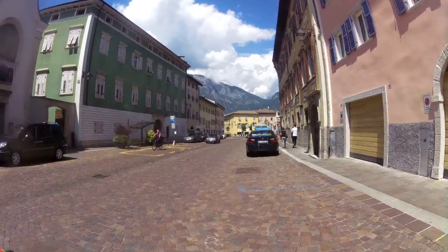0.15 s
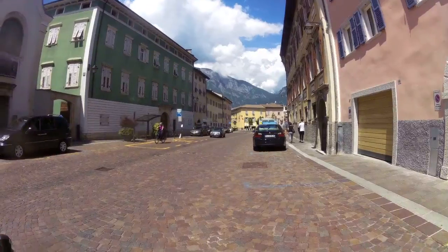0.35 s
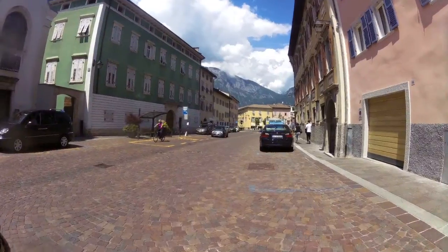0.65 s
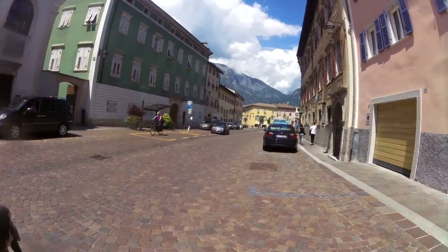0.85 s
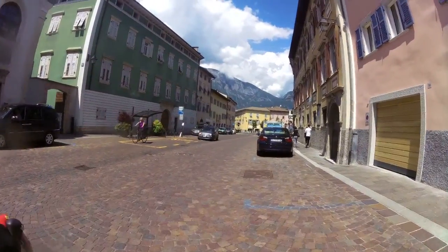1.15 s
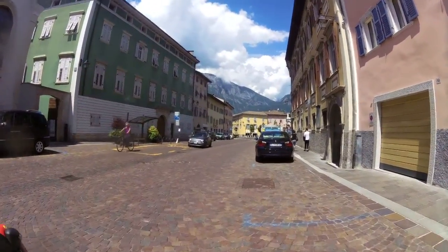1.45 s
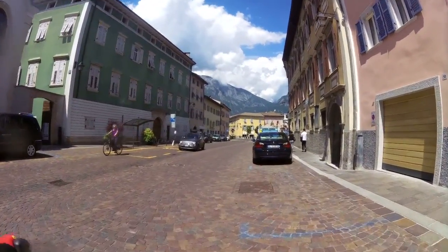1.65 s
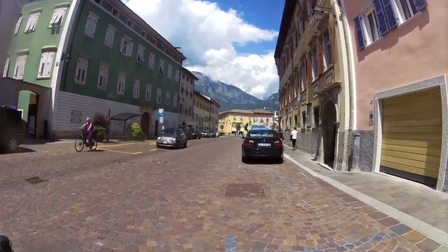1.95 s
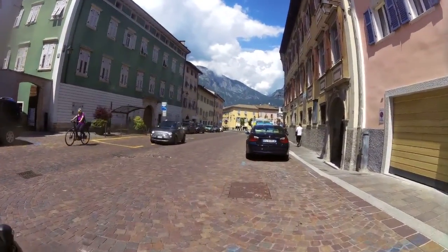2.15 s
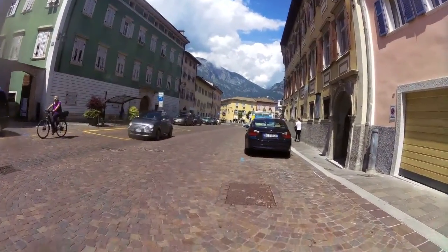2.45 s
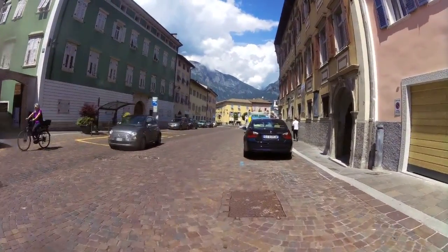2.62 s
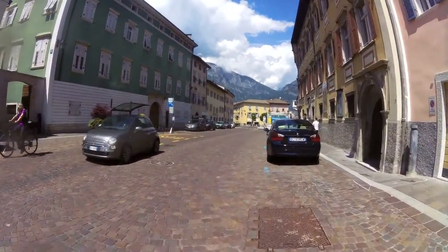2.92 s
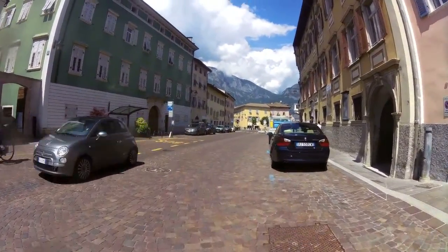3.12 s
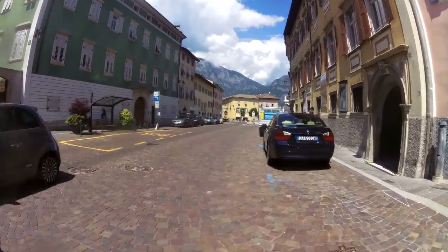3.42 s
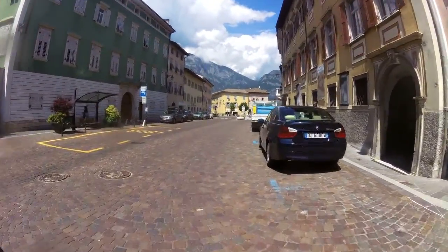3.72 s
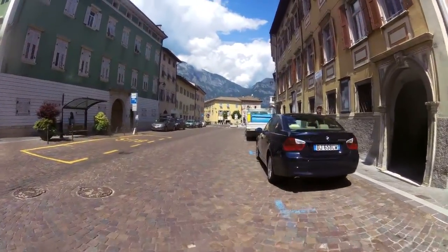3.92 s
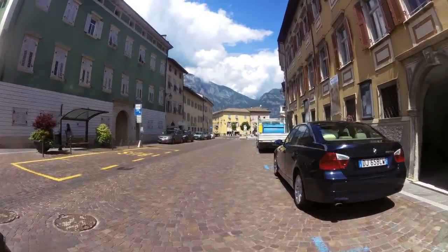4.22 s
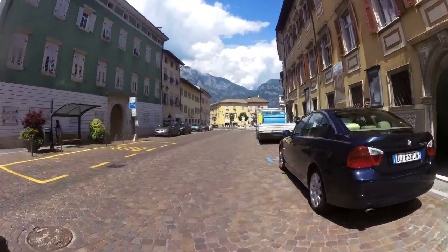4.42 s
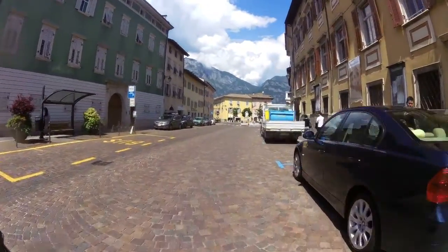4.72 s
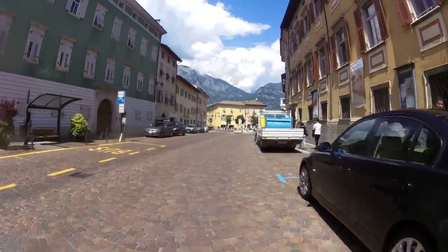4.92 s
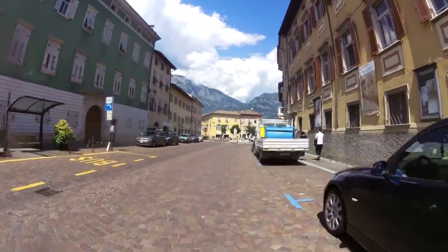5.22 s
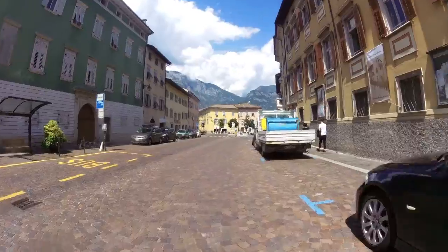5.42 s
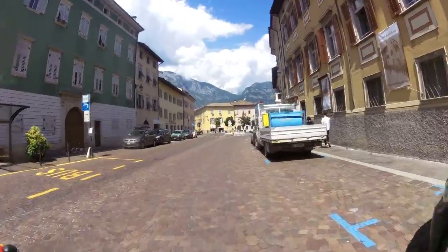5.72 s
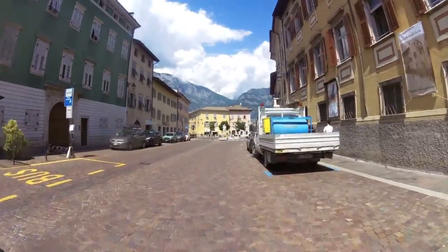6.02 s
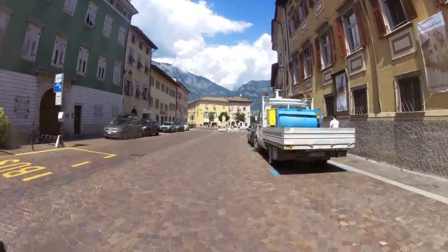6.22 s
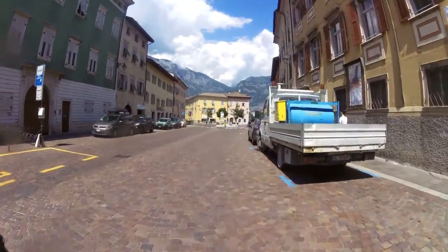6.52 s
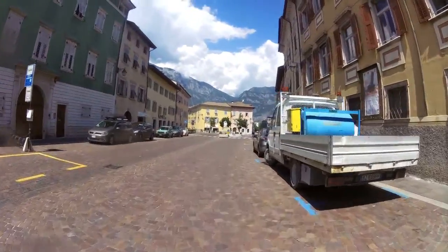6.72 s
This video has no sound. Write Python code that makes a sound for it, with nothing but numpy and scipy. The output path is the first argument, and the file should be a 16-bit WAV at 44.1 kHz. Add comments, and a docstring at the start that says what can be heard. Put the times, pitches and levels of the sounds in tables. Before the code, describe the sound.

Heard from a plastic case on a bicycle handlebar in a cobbled town street: tyre roar fades in with chain ticks and case taps. A brake pad scuffs the rim, a hard knock follows, then low wind buffeting begins. A car passes with slapping stones, a metal fitting clanks, and the rattling grows denser, with two faint bird chirps near the end.

```python
"""A bicycle rolls down a cobbled town street, heard from a plastic case on its handlebar.
Tyre noise fades in, hiss ahead of roar, with chain and cable ticks and case taps: noise and struck resonances.
The mount knocks from 0.4 s; from 1.2 s a brake pad scuffs the rim (banded noise); from 2.1 s wind buffets the case.
Stones slap under a car passing at 3.4 s (delayed noise); a fitting clanks at 3.9 s, a parked car returns a swish
at 4.65 s, and a small bird chirps at 5.0 and 5.8 s (gliding tones) as the shaking rises and falls."""
import sys
import numpy as np
from scipy import signal
from scipy.fft import rfft, irfft, next_fast_len
from scipy.io import wavfile
from scipy.ndimage import uniform_filter1d, map_coordinates

SR = 44100
rng = np.random.default_rng(int(sys.argv[2]) if len(sys.argv) > 2 else 0)


def dump_mix(stems):
    """Bounce the given channels to the path in sys.argv[1] as a 16-bit WAV at rate SR."""
    frames = np.atleast_2d(stems).T  # one column per channel
    limited = np.clip(frames, -1, 1)  # hard clip at full scale
    pcm = np.round(limited * 32767).astype(np.int16)
    wavfile.write(sys.argv[1], SR, pcm)


N = 302702

# All levels precede the final fade and limiting. Spectra give relative shape only.
# Resonances list centre_hz, width_hz, gain_db for one pass.

# Bird chirps, before a 3 dB cut in the sum: start_s, peak_db
BIRD_CHIRPS = [(4.984, -44), (5.846, -42)]
CHIRP_FROM_HZ, CHIRP_TO_HZ, CHIRP_S = 4600, 3200, 0.12

# Spectrum of the car's tyre roar: frequency_hz, density_db
CAR_SPECTRUM = [(120, -13.5), (300, 3), (600, -7.5), (800, -4), (950, 0.5), (1100, 0), (1350, -6),
                (1700, -8.5), (2200, -17.5), (3000, -25), (4500, -47.5), (6000, -56), (8500, -57),
                (12000, -82.5)]
# Band in which the car's tread drums on single stones: centre_hz, width_hz, gain_db
CAR_TREAD_MODES = [(1000, 165, 0)]
PASS_S, CAR_DB = 3.42, -24.5  # moment of passing, mean level then
GAP_M, CLOSING_M_PER_S, SOUND_M_PER_S = 7.5, 8.5, 343
CAR_FALLOFF = 2.01  # power of distance by which amplitude falls
TREAD_DB, TREAD_SLAPS_PER_S = -5, 100  # drumming against the roar; mean rate of stones struck

# Steady wind on the case: time_s, level_db
WIND_LEVEL = [(.25, -45), (.6, -41.5), (.95, -34.5), (1.3, -38), (2.05, -35.5), (2.14, -27), (3.7, -26),
              (4.4, -26), (4.9, -23.5), (5.6, -25.5), (6.2, -26), (6.86, -24.5)]
# Lulls added to the steady wind: middle_s, half_width_s, depth_db
WIND_LULLS = [(2.869, 0.03976, -4), (4.57, 0.0259, -5), (5.571, 0.0446, -4), (5.86, 0.0417, -3.5),
              (6.07, .025, -3), (6.51, .07, -3)]
# Gusts on top of it: start_s, length_s, strength_db
WIND_GUSTS = [(2.134, 0.13, 6), (2.448, 0.0526, 5), (2.572, .14, 5.5), (3.038, 0.44, 7), (3.962, 0.1318, 6),
              (4.122, 0.02746, 6.5), (4.224, 0.0836, 8.5), (4.339, 0.076, 12), (4.497, 0.0335, 5.5),
              (4.61, 0.0453, 7.5), (4.74, 0.049, 3.5), (4.908, 0.0702, 7), (5.004, .14, 9.5),
              (5.208, .11, 7), (5.363, 0.0914, 6.5), (5.628, 0.022, 5), (5.699, 0.083, 9),
              (5.973, 0.039, 6), (6.099, 0.0778, 5.5), (6.253, 0.0755, 5.5), (6.597, 0.037, 9),
              (6.747, 0.16, 7.5)]
# Spectra of deep buffeting and higher flutter, at the reference wind: frequency_hz, density_db
BUFFET_SPECTRUM = [(20, -28.5), (32, -20), (50, -5.5), (75, 0.5), (130, 4), (200, 1.5), (270, -1.5),
                   (400, -18.5), (800, -83)]
FLUTTER_SPECTRUM = [(130, -15), (230, -2.5), (290, 2.5), (400, 0), (520, -5), (700, -14.5), (1200, -53),
                    (2500, -74)]
GUST_ATTACK_S, GUST_RELEASE_S = 0.006, 0.03
BUFFET_GROWS, FLUTTER_DB = 0.4, -11  # share of gust dB given to buffeting; flutter against steady wind
EDDY_RISE, EDDY_REFERENCE_DB = .16, -22.5  # dB of pitch per dB of wind; wind that leaves pitch as it is
STEADY_S, STEADINESS = 0.062, 0.5  # span over which wind noise evens out, and how fully (0-1)

# Jolts through the frame: start_s, peak_db, pitch_hz
FRAME_JOLTS = [(1.839, -15, 330), (2.104, -13, 380), (2.689, -13, 200), (3.07, -11.5, 290),
               (3.11, -13, 230), (3.181, -13, 250), (3.904, -11, 480), (4.027, -10, 400), (4.244, -7, 320),
               (4.274, -13, 300), (4.41, -12, 225), (4.789, -13, 200), (5.273, -13, 250), (5.769, -10, 205),
               (6.181, -16, 480), (6.229, -11, 450), (6.607, -12, 250), (6.638, -11, 370)]

# Onsets of brake scuffing: start_s, level_db
BRAKE_SCUFFS = [(1.185, -31), (1.46, -40.5)]
# Bands in which the rim sings: centre_hz, width_hz, gain_db
RIM_MODES = [(1410, 90, 11.5), (1950, 210, 2), (2700, 80, -3), (3200, 98, -7), (3790, 70, -6.5),
             (4410, 55, -12.5), (4770, 150, -23), (5600, 150, -26), (6430, 180, -22), (8000, 600, -22)]
SCUFF_ATTACK_S, SCUFF_HOLD_S, SCUFF_T60_S = .005, 0.05, 0.87  # hold counts from the onset
SCUFF_GRIT_DB = -20  # grit under the pad, against the singing rim

# Knocks of the plastic mount, and from 2.98 to 3.88 s slaps of stones under the passing car's tyres:
# start_s, peak_db, pitch_factor, brightness_edge_hz, added_damping_t60_s
KNOCKS_AND_SLAPS = [(.408, -20, 1.1, 1600, .012), (1.628, -11, 1, 800, .1), (1.632, -14, 1, 1200, .03),
                    (1.8382, -1, 1.04, 6000, .035), (1.8575, -12, 1.07, 4500, .02),
                    (1.8605, -6, 1.04, 2200, .04), (1.867, -7, 1.02, 1500, .03),
                    (2.106, -17, 1.3, 2500, .03), (2.981, -15, 1.25, 1300, .03),
                    (3.066, -12, 1.26, 1400, .03), (3.32, -14, 1.45, 1500, .03),
                    (3.529, -10.5, 1.45, 1500, .02), (3.773, -11, 1.25, 1300, .02),
                    (3.794, -10.5, 1.35, 1400, .02), (3.882, -9, 1.4, 1300, .025),
                    (5.322, -19, 1.1, 1200, .06)]
# Resonances of these knocks and slaps before the pitch factor: centre_hz, width_hz, gain_db
KNOCK_MODES = [(726, 143, 9), (1063, 115, 10), (1350, 315, 3), (2520, 440, -4.5), (3230, 210, -18.5),
               (4400, 410, -18), (8060, 1300, -31)]
# Clanks of a loose metal fitting: start_s, peak_db, brightness_edge_hz
FITTING_CLANKS = [(3.902, 0, 4800), (3.933, -19.5, 3000), (4.248, -15, 1790), (4.255, -15, 1300)]
# Resonances of the fitting: centre_hz, width_hz, gain_db
FITTING_MODES = [(1005, 170, -4.5), (1563, 80, 4.5), (1935, 190, -5.5), (2390, 160, 2), (3180, 460, -13),
                 (3670, 210, -10), (5380, 720, -18.5), (8400, 1800, -52)]
# Ringing after a clank: frequency_hz, level_relative_to_clank_db, t60_s
FITTING_TAIL = [(2380, -10.5, 0.036), (2487, -40.5, 0.23), (2610, -28, 0.13), (3505, -46, .26),
                (5389, -57, .35), (6550, -64, .25)]
REBOUND_S, REBOUND_LOSS_DB = .0025, 6  # each knock or slap rebounds once
BOUNCE_S, BOUNCE_LOSS_DB = .0022, 4.5  # the fitting bounces twice

# Chain and cable ticks, and at 1.838 and 1.863 s the bright crack of the mount knocks, # before TICK_GAIN_DB
# and CRACK_DB: start_s, peak_db, pitch_hz, crack_level_db
CHAIN_TICKS = [(0.3195, -38, 3520, -62), (0.405, -43.5, 3340, -61), (0.543, -35, 3200, -63),
               (0.671, -24.5, 3800, -68), (0.679, -33, 3700, -63), (0.7188, -34.5, 2950, -74),
               (0.747, -35, 3160, -68), (0.769, -28, 3220, -55), (0.8784, -32, 2800, -72),
               (0.9093, -30, 3100, -65), (0.9583, -34, 3200, -63), (1.051, -37, 3000, -69),
               (1.0665, -33, 2800, -70), (1.1253, -41, 2810, -64), (1.1932, -29, 3770, -71),
               (1.3403, -39, 3180, -57), (1.369, -34, 2910, -75), (1.425, -32, 2780, -69),
               (1.5532, -27.5, 2970, -70), (1.636, -34, 3000, -68), (1.718, -25, 2830, -62),
               (1.798, -28, 2850, -63), (1.827, -28, 3060, -63), (1.8377, -19, 3570, -47),
               (1.863, -16.5, 2820, -54), (1.8814, -42, 3170, -63), (1.933, -31, 2840, -63),
               (2.028, -35, 3070, -64), (2.0927, -24, 2920, -60), (2.2852, -38, 2780, -62),
               (2.3955, -36, 2900, -61), (2.5224, -34, 3250, -61), (2.6025, -33, 2850, -73),
               (2.6693, -40, 2850, -88), (2.7684, -29, 2800, -67), (2.838, -35, 2930, -69),
               (3.1822, -22.5, 2770, -55), (3.356, -38, 3010, -51), (3.3997, -37, 3190, -56),
               (3.451, -48, 3150, -73), (3.506, -32, 2940, -68.5), (3.66, -27.5, 3080, -58),
               (3.782, -30.5, 3020, -56), (3.8505, -29, 2833, -50), (4.414, -38, 2840, -70),
               (4.488, -28.5, 3100, -52), (4.5431, -34, 3180, -57), (4.5854, -33, 2850, -74),
               (4.637, -28, 4050, -59), (4.6495, -20, 2820, -42.5), (4.7085, -24.5, 2832, -50),
               (4.7486, -42, 2800, -71), (4.7826, -28, 2800, -58), (4.824, -24.5, 2900, -64),
               (4.86, -26, 2871, -68), (4.94, -31, 3787, -69), (4.955, -26, 2960, -67),
               (4.9747, -29, 3650, -48), (5.016, -20, 3660, -54), (5.32, -32, 3070, -60),
               (5.343, -27.5, 2960, -62), (5.402, -34, 2960, -62), (5.5054, -29, 3209, -56),
               (5.5395, -31, 2940, -70), (5.56, -24, 2940, -59), (5.583, -30, 4074, -49),
               (5.5994, -27.5, 2880, -58), (5.787, -31, 2900, -59), (5.807, -34, 2930, -65),
               (6.1444, -24, 2870, -57), (6.238, -35.5, 3160, -60), (6.2665, -23, 3280, -53),
               (6.303, -37, 3050, -60), (6.329, -28, 3120, -57), (6.37, -25, 3880, -59),
               (6.4009, -23, 2970, -53), (6.4712, -25, 3970, -44), (6.4934, -34, 2870, -62),
               (6.5305, -28, 2960, -55), (6.555, -31, 2970, -58), (6.6157, -27, 2960, -59),
               (6.6333, -22.5, 3610, -48), (6.649, -39, 2890, -70), (6.725, -30, 2940, -63),
               (6.776, -27, 3200, -55), (6.799, -18, 4000, -46), (6.8255, -19.5, 3670, -50)]
# Shivers of the chain after a bump: start_s, peak_db, t60_s, sizzle_peak_db
CHAIN_SHIVERS = [(1.63, -20.5, 0.055, -61), (1.843, -20, .07, -46), (1.864, -15.5, 0.017, -42),
                 (2.105, -26, 0.13, -47.5), (3.906, -26, 0.38, -46.5), (4.249, -16, 0.083, -54),
                 (5.585, -28, 0.27, -51), (5.72, -41, 0.35, -50.5)]
# One thin, sharp click: start_s, peak_db
SHARP_CLICK = (5.3375, -18)
# Resonances of the chain before each part's stretch: centre_hz, width_hz, gain_db
CHAIN_MODES = [(2270, 610, 2), (3800, 1180, -4), (5000, 620, -12), (8450, 1500, -19)]
# Bright resonances of a crack, passed twice: centre_hz, width_hz, gain_db
CRACK_MODES = [(5650, 1900, 0.5), (8860, 2700, -1.5)]
TICK_GAIN_DB, CRACK_DB = 0.5, 9.5  # added to the tick peaks; added to the crack levels to give peaks
OWN_RING_DB = 2.5  # gain of a part's own resonance beside the chain's
CHATTER_DB, CHATTER_GROWS = -53, 1.16  # rattle at 0 dB shaking, for each part size; its dB per dB of shaking

# Hard taps of the case, before TAP_GAIN_DB: start_s, peak_db
HARD_TAPS = [(.743, -21.5), (1.064, -24), (1.195, -19), (1.751, -18.5), (2.031, -20), (2.151, -21),
             (2.259, -19.5), (2.329, -19.5), (2.365, -19.5), (2.400, -20), (2.534, -18), (2.581, -20),
             (2.671, -19.5), (2.780, -16.5), (2.843, -17), (2.917, -18), (3.066, -24), (3.147, -16),
             (3.227, -26), (3.400, -23), (3.644, -17), (3.673, -14), (3.975, -17.5), (4.0266, -12),
             (4.143, -15.5), (4.1807, -13.5), (4.39, -23.5), (4.4122, -14.5), (4.5315, -10.5), (4.59, -20),
             (4.6508, -9), (4.7205, -16), (4.774, -23), (4.7965, -10), (4.880, -20), (4.9248, -15.5),
             (5.0308, -17), (5.0523, -16), (5.2389, -13.5), (5.2782, -17), (5.321, -15), (5.362, -21.5),
             (5.393, -22), (5.448, -19.5), (5.4895, -17), (5.54, -14.5), (5.5992, -13.5), (5.628, -21),
             (5.646, -20.5), (5.684, -16), (5.751, -19), (5.787, -19.5), (5.8325, -15), (5.877, -12.5),
             (5.913, -19), (5.934, -19.5), (6.008, -15.5), (6.038, -14.5), (6.0687, -15.5), (6.110, -22),
             (6.2146, -11.5), (6.335, -22), (6.3597, -12.5), (6.496, -19.5), (6.542, -21), (6.5797, -16),
             (6.632, -15), (6.707, -7.5), (6.768, -20.5), (6.788, -12)]
# Faint taps in between, as the case works loose: time_s, typical_peak_db
FAINT_TAP_LEVEL = [(0, -33), (2.3, -29), (6.86, -27)]
# Main and upper resonance of the case before scatter: centre_hz, width_hz, gain_db
CASE_MODES = [(1776, 217, 12), (2700, 600, -9)]
TAP_GAIN_DB, TAP_COLOUR_SCATTER_DB = -0.5, 4  # trim of hard taps; tap-to-tap spread of the upper mode
STONES_PER_S, STONE_SCATTER = 16, .17  # stones under the wheel; spread of timing, in stone spacings

# Relative shaking of the bicycle, which drives hiss and chatter: time_s, shaking_db
SHAKING = [(0, -6), (2.3, -8.5), (3.85, -1.5), (4.42, -4), (4.95, 3.5), (5.13, -8), (5.55, 3), (6.1, -1.5),
           (6.45, 3.5), (6.86, 4.5)]
# Tyre roar, before a 0.23 dB lift: time_s, level_db
TYRE_LEVEL = [(.25, -32.5), (.9, -33.5), (1.5, -32), (4.1, -30), (4.45, -34), (5.2, -35.5), (6.4, -36),
              (6.86, -34.5)]
# Spectra of tyre roar and of tread hiss or brake grit: frequency_hz, density_db
ROAR_SPECTRUM = [(150, -9.5), (350, -3.5), (600, -4), (780, 1.5), (950, -1), (1300, 0.5), (1700, -9),
                 (2200, -12.5), (2900, -22.5), (4000, -33), (6000, -70.5)]
HISS_SPECTRUM = [(1000, -18), (1800, 9), (2600, 0), (3300, -6), (4200, -9.5), (5000, -12), (6200, -27.5),
                 (7200, -25.5), (8700, -27.5), (10500, -44.5), (15000, -64.5)]
# Band of the swish off a parked car, passed twice: centre_hz, width_hz, gain_db
SWISH_MODES = [(1216, 200, 0)]
HISS_DB, HISS_GROWS = -47.5, 0.75  # hiss at 0 dB shaking; its dB per dB of shaking
HISS_LEAD_DB, HISS_LEAD_S = 10, .27  # early lift of the hiss: full for half this time, gone at its end
SWISH_S, SWISH_DB, SWISH_WIDTH_S = 4.65, -33, 0.26  # middle, level, time to fall 6 dB either side

# Overall fade-in, silent before its first row: time_s, gain_db
FADE_IN = [(.031, -22.5), (.11, -21), (.135, -11.5), (.2, -5), (.27, 0.5)]
TOP_HZ = 15800  # upper limit of the band


def amp(db):
    """Logarithmic level: decibels to an amplitude ratio."""
    return 10 ** (np.asarray(db) / 20)


def decay(t, t60):
    """Exponential damping: amplitude falls 60 dB in t60 seconds."""
    return amp(-60 * t / t60)


def unit(x):
    """Root-mean-square level: scale to rms 1."""
    return x / np.sqrt(np.mean(x ** 2) + 1e-20)


def clock():
    """Sampling: time of each sample in seconds."""
    return np.arange(N) / SR


def curves(rows):
    """Linear interpolation: one value per sample for each column after the time."""
    s, *columns = np.transpose(rows)
    return [np.interp(clock(), s, column) for column in columns]


def bell(middle_s, half_width_s):
    """Gaussian envelope: 1 at the middle, one half at the half width."""
    return .5 ** (((clock() - middle_s) / half_width_s) ** 2)


def wobble(rate):
    """Slow random modulation: a smooth curve through rate random knots a second."""
    knots = rng.standard_normal(int(N * rate / SR) + 4)
    return map_coordinates(knots, [np.arange(N) * rate / SR])


def filtered(x, response):
    """Linear filtering: multiply the spectrum by a complex response of frequency."""
    size = next_fast_len(len(x) + 8192)
    return irfft(rfft(x, size) * response(np.fft.rfftfreq(size, 1 / SR)), size)[:len(x)]


def coloured(x, spectrum):
    """Spectral shaping: filter by (Hz, dB) points on a logarithmic axis, at rms 1."""
    f, db = np.transpose(spectrum)
    return unit(filtered(x, lambda hz: amp(np.interp(np.log(hz + 1), np.log(f), db))))


def ring(x, modes, stretch=1):
    """Modal superposition: excite a body's damped resonances, all scaled in frequency by stretch."""
    def response(hz):
        f = hz / stretch
        total = 0
        for k, (centre, width, db) in enumerate(modes):
            damping = 1j * f * width
            # neighbouring modes have opposite signs
            total = total + (-1) ** k * amp(db) * damping / (centre ** 2 - f ** 2 + damping)
        return total
    return filtered(x, response)


def muffled(x, edge_hz, order):
    """Treble loss: a causal low-pass."""
    return signal.sosfilt(signal.butter(order, edge_hz, fs=SR, output='sos'), x)


def contact(grit, t60):
    """Impact excitation: a sharp impulse followed by a short dying chatter."""
    t = np.arange(SR // 10) / SR
    return (t == 0) + grit * rng.standard_normal(len(t)) * decay(t, t60)


def impacts(rate, spread_db):
    """Shot noise: randomly timed pulses of uneven size and either sign, at rms 1."""
    sizes = amp(spread_db * np.clip(rng.standard_normal(N), -2, 2)) * rng.choice([-1, 1], N)
    return unit(sizes * (rng.random(N) < rate / SR))


def steady(x):
    """Level compression: even out the slow swells of a noise, leaving its fast grain, at rms 1."""
    power = np.abs(uniform_filter1d(x ** 2, int(STEADY_S * SR))) + 1e-9
    return unit(x / power ** (STEADINESS / 2))


def add(track, s, db, sound):
    """Superposition: add a sound from time s with its peak at db."""
    room = track[max(round(s * SR), 0):][:len(sound)]
    room += (amp(db) * sound / np.abs(sound).max())[:len(room)]


def bird():
    """Frequency modulation: each chirp is a short, quivering whistle sliding down."""
    out, t = np.zeros(N), np.arange(SR // 8) / SR
    for s, db in BIRD_CHIRPS:
        glide_hz = np.interp(t, [0, CHIRP_S], [CHIRP_FROM_HZ, CHIRP_TO_HZ])
        hz = glide_hz * (1 + .035 * wobble(300)[:len(t)])
        swell = np.interp(t / CHIRP_S, [0, .15, .3, .5, .8, 1], [0, 1, .4, .1, .5, 0])
        add(out, s, db, swell * np.sin(2 * np.pi * np.cumsum(hz) / SR))
    return out


def street(x, t60):
    """Diffuse reflection: the house fronts return a dull, scattered tail."""
    t = np.arange(SR // 2) / SR
    scatter = muffled(rng.standard_normal(len(t)), edge_hz=5000, order=2)
    tail = scatter * decay(t, t60) * (t > .012)
    return signal.fftconvolve(x, tail / np.linalg.norm(tail))[:N]


def car():
    """Doppler effect: distance sets the level and delay of tyre noise, so its pitch sags as the car goes by."""
    distance_m = np.hypot(GAP_M, CLOSING_M_PER_S * (clock() - PASS_S))
    roar = coloured(rng.standard_normal(N) + 0.66 * impacts(rate=220, spread_db=6), CAR_SPECTRUM)
    blows = impacts(rate=TREAD_SLAPS_PER_S, spread_db=4)
    slaps = signal.fftconvolve(blows, contact(grit=0.58, t60=.03))[:N]
    drumming = unit(muffled(ring(slaps, CAR_TREAD_MODES), edge_hz=2130, order=4))
    sent = roar + amp(TREAD_DB) * drumming
    emission_s = clock() - distance_m / SOUND_M_PER_S
    heard = map_coordinates(sent, [emission_s * SR], mode='mirror')
    return amp(CAR_DB + 1.15 * wobble(45)) * (GAP_M / distance_m) ** CAR_FALLOFF * heard


def gusts():
    """Transient flow: strength in dB of the strongest gust at each moment."""
    shapes = []
    for s, length, db in WIND_GUSTS:
        rise = (clock() - s) / GUST_ATTACK_S + .5
        fall = (s + length - clock()) / GUST_RELEASE_S + 1
        shapes.append(db * np.clip(np.minimum(rise, fall), 0, 1))
    return np.max(shapes, axis=0)


def wind():
    """Vortex shedding: eddies press on the case in lumps; in a gust they come faster and flutter more."""
    steady_db = curves(WIND_LEVEL)[0]
    for s, half_width, db in WIND_LULLS:
        steady_db = steady_db + db * bell(s, half_width)
    gust_db = gusts()
    # faster air reads through the eddy noise faster, raising its pitch
    air_passed = np.cumsum(amp(EDDY_RISE * (steady_db + gust_db - EDDY_REFERENCE_DB)))

    def eddies(spectrum):
        noise = coloured(rng.standard_normal(N), spectrum)
        return steady(map_coordinates(noise, [air_passed], mode='mirror'))
    buffet = unit(amp(1.1 * wobble(40)) * eddies(BUFFET_SPECTRUM))
    flutter = unit(amp(2.6 * wobble(110)) * eddies(FLUTTER_SPECTRUM))
    buffet_gain = amp(steady_db + BUFFET_GROWS * gust_db)
    flutter_gain = amp(steady_db + FLUTTER_DB + gust_db)
    return buffet_gain * buffet + flutter_gain * flutter


def jolts():
    """Heavily damped oscillation: a high stone pushes the frame through a cycle or two."""
    out, t = np.zeros(N), np.arange(SR // 20) / SR
    for s, db, hz in FRAME_JOLTS:
        cycles = t * hz
        add(out, s, db, np.sin(2 * np.pi * cycles) * cycles * np.exp(-cycles / .5))
    return out


def brake():
    """Friction excitation: the pad grabs, rubs over grit and lets go; the rim sings in a few narrow bands."""
    pressure = np.zeros(N)
    for s, db in BRAKE_SCUFFS:
        t = clock() - s
        release = decay(np.maximum(t - SCUFF_HOLD_S, 0), SCUFF_T60_S)
        pressure += np.clip(t / SCUFF_ATTACK_S, 0, 1) * amp(db) * release
    rubbing = unit(muffled(ring(rng.standard_normal(N), RIM_MODES), edge_hz=4500, order=4))
    grit = coloured(impacts(rate=460, spread_db=11), HISS_SPECTRUM)
    return amp(0.89 * wobble(54)) * pressure * (rubbing + amp(SCUFF_GRIT_DB) * grit)


def knocks_and_slaps():
    """Damped impact: the mount knocks, or a stone slaps under the car's tyre; each rebounds once, softer."""
    out = np.zeros(N)
    for s, db, pitch, edge_hz, t60 in KNOCKS_AND_SLAPS:
        for k in range(2):
            blow = ring(contact(grit=0.17, t60=0.03), KNOCK_MODES, stretch=pitch)
            damped = blow * decay(np.arange(len(blow)) / SR, t60)
            add(out, s + k * REBOUND_S, db - k * REBOUND_LOSS_DB, muffled(damped, edge_hz, order=2))
    return out


def clanks():
    """Repeated impact: a metal fitting clanks, bounces a little softer each time, and rings on."""
    out, t = np.zeros(N), np.arange(SR // 3) / SR
    for s, db, edge_hz in FITTING_CLANKS:
        for hz, mode_db, t60 in FITTING_TAIL:
            phase = 2 * np.pi * hz * t + wobble(130)[:len(t)]
            add(out, s, db + mode_db, np.sin(phase) * decay(t, t60))
        for k in range(3):
            clank = ring(contact(grit=0.22, t60=0.028), FITTING_MODES)
            add(out, s + k * BOUNCE_S, db - k * BOUNCE_LOSS_DB, muffled(clank, edge_hz, order=2))
    return out


def crack(x):
    """Cascaded resonance: two passes through the bright modes."""
    return ring(ring(x, CRACK_MODES), CRACK_MODES)


def ticks():
    """Modal excitation: chain links and cables tick, each at its own pitch, with a bright crack."""
    out = np.zeros(N)
    for s, db, hz, crack_db in CHAIN_TICKS:
        blow = contact(grit=0.19, t60=0.025)
        chain = ring(blow, CHAIN_MODES, stretch=np.exp(0.14 * rng.standard_normal()))
        own_ring = ring(blow, [(hz, 450, OWN_RING_DB)])
        add(out, s, db + TICK_GAIN_DB, muffled(chain + own_ring, edge_hz=4430, order=4))
        add(out, s, crack_db + CRACK_DB, crack(blow))
    add(out, *SHARP_CLICK, np.ones(1))  # a single-sample impulse
    return out


def shivers():
    """Decaying random excitation: the chain shivers after a bump, with a bright sizzle."""
    out, t = np.zeros(N), np.arange(SR // 3) / SR
    for s, db, t60, sizzle_db in CHAIN_SHIVERS:
        shiver = rng.standard_normal(len(t)) * decay(t, t60)
        add(out, s, db, muffled(ring(shiver, CHAIN_MODES, stretch=0.99), edge_hz=2300, order=2))
        add(out, s, sizzle_db, crack(shiver))
    return out


def chatter():
    """Random impact: small parts of three sizes rattle independently, following the shaking."""
    out = np.zeros(N)
    level = amp(CHATTER_DB + CHATTER_GROWS * curves(SHAKING)[0])
    for stretch in (.9, 1, 1.12):
        blows = signal.fftconvolve(impacts(rate=23, spread_db=6), contact(grit=0.26, t60=0.046))[:N]
        out += level * unit(muffled(ring(blows, CHAIN_MODES, stretch), edge_hz=5340, order=2))
    return out


def case_tap():
    """Variable contact: each tap lands a little differently in pitch, brightness, damping and colour."""
    detune, hardness, damping, colour = np.clip(rng.standard_normal(4), -1.7, 1.7)
    (hz, width, main_db), (upper_hz, upper_width, upper_db) = CASE_MODES
    main = (hz, width * 1.35 ** damping, main_db)
    upper = (upper_hz, upper_width, upper_db + TAP_COLOUR_SCATTER_DB * colour)
    tap = ring(contact(grit=0.085, t60=0.017), [main, upper], stretch=1 + 0.03 * detune)
    return muffled(tap, edge_hz=2400 * np.exp(0.065 * hardness), order=4)


def taps():
    """Impulsive excitation: stones rock the case in its mount; some taps are much harder than others."""
    out = np.zeros(N)
    offset, size = rng.standard_normal((200, 2)).T
    times = (np.arange(len(offset)) + 1 + STONE_SCATTER * offset) / STONES_PER_S
    light_db = np.interp(times, *np.transpose(FAINT_TAP_LEVEL)) + 2.3 * np.clip(size, -2, 2)
    hard = [(s, db + TAP_GAIN_DB) for s, db in HARD_TAPS]
    light = []
    for s, db in zip(times, light_db):
        # no light tap within half a stone spacing of a hard one
        clear = min(abs(s - hard_s) for hard_s, _ in hard) > .5 / STONES_PER_S
        if s < N / SR and clear:
            light.append((s, db))
    for s, db in hard + light:
        add(out, s, db, case_tap())
    return out


def swish():
    """Specular reflection: the tyre noise swishes back from a parked car, as a swell of banded noise."""
    band = ring(ring(rng.standard_normal(N), SWISH_MODES), SWISH_MODES)
    return amp(SWISH_DB) * bell(SWISH_S, SWISH_WIDTH_S) * unit(band)


def tread_hiss():
    """Granular excitation: a flickering hiss of noise and small impacts grows with the shaking."""
    grit = rng.standard_normal(N) + 0.45 * impacts(rate=480, spread_db=6)
    lead_db = HISS_LEAD_DB * np.clip(2 * (1 - clock() / HISS_LEAD_S), 0, 1)
    level_db = HISS_DB + HISS_GROWS * curves(SHAKING)[0] + lead_db + 1.8 * wobble(31)
    return amp(level_db) * coloured(grit, HISS_SPECTRUM)


def tyre_roar():
    """Broadband impact noise: rubber slaps stone after stone, blending into a roar."""
    slaps = rng.standard_normal(N) + .5 * impacts(rate=250, spread_db=-0.5)
    level_db = curves(TYRE_LEVEL)[0] + 0.23 + 0.94 * wobble(25)
    return amp(level_db) * coloured(slaps, ROAR_SPECTRUM)


def scene():
    """Superposition at the handlebar: all sources add, and the street echoes the clatter and the bird."""
    chirps = bird()
    clatter = knocks_and_slaps() + clanks() + ticks() + shivers() + chatter()
    echo = street(amp(-26) * clatter + amp(-16) * chirps, t60=.4)
    background = amp(-3) * chirps + echo + car() + wind()
    foreground = jolts() + brake() + clatter + taps() + swish() + tread_hiss() + tyre_roar()
    return (background + foreground)[None]


def record(dry):
    """Saturation and band limiting: fade in, squash the loudest peaks, soften treble and thin deep bass."""
    x = dry[0] * (clock() > FADE_IN[0][0]) * amp(curves(FADE_IN)[0])
    x = x / (1 + np.abs(x / .74) ** 6) ** (1 / 6)  # peaks level off towards 0.74
    x = muffled(x, edge_hz=8800, order=2)
    return filtered(x, lambda hz: (hz < TOP_HZ) * hz ** 4 / (hz ** 4 + 27 ** 4))[None]


dry = scene()
out = record(dry)
dump_mix(out)
```